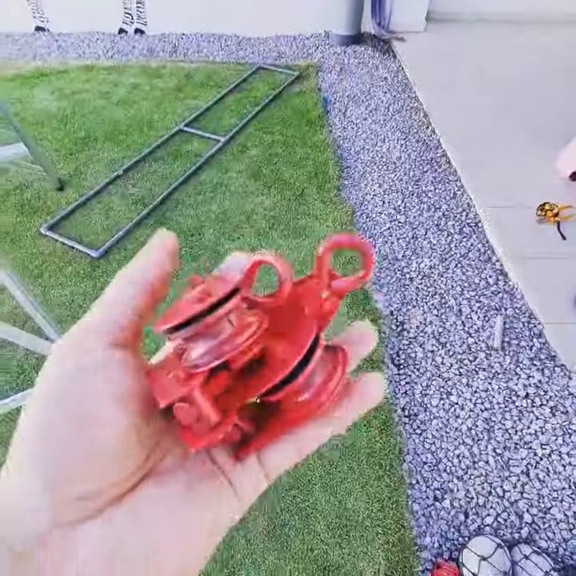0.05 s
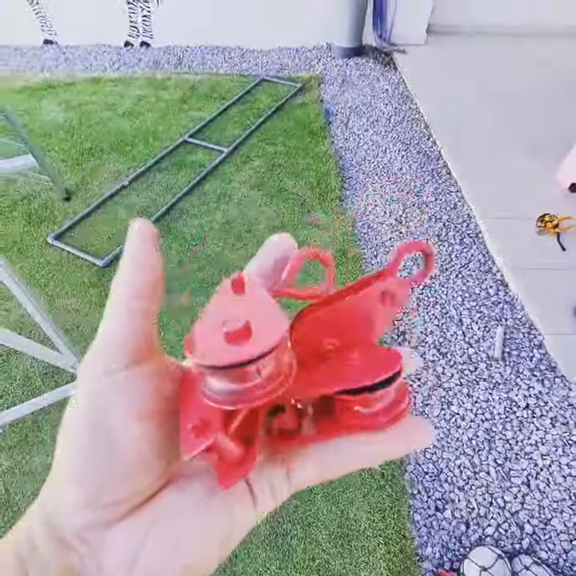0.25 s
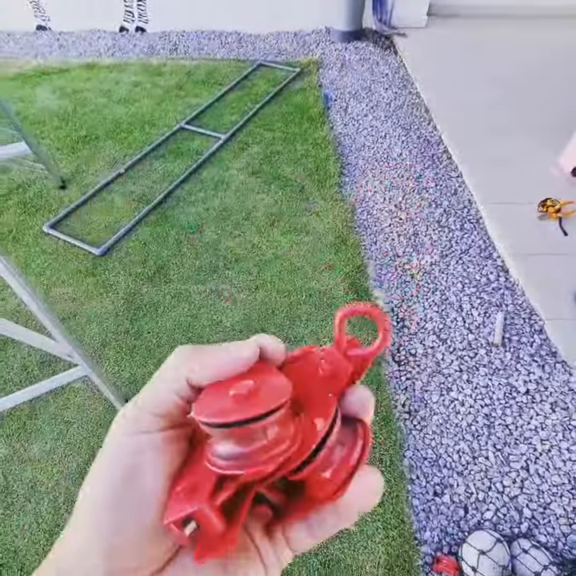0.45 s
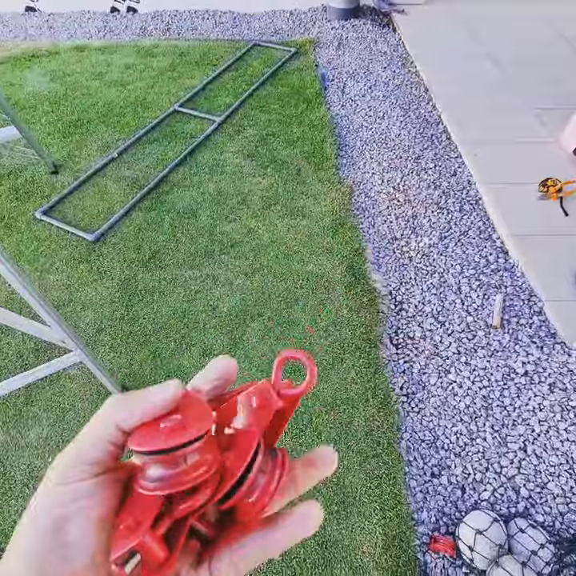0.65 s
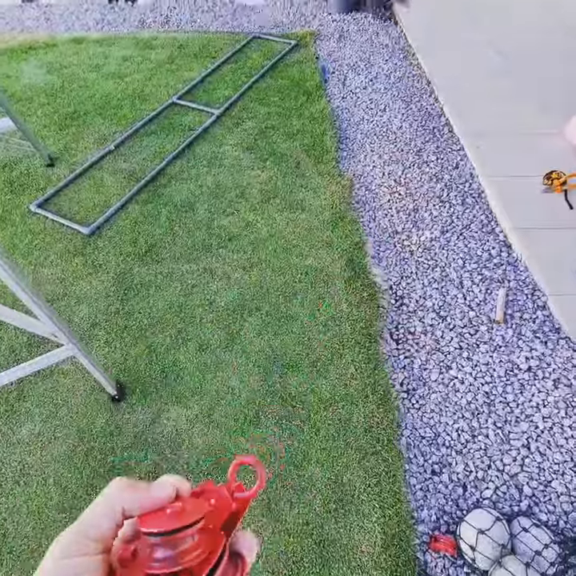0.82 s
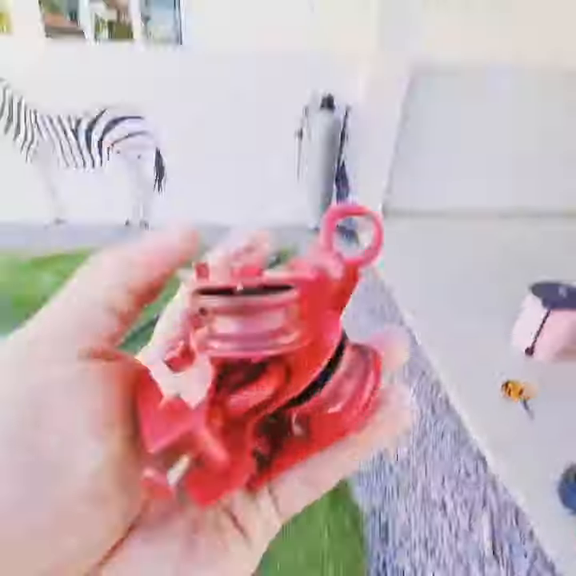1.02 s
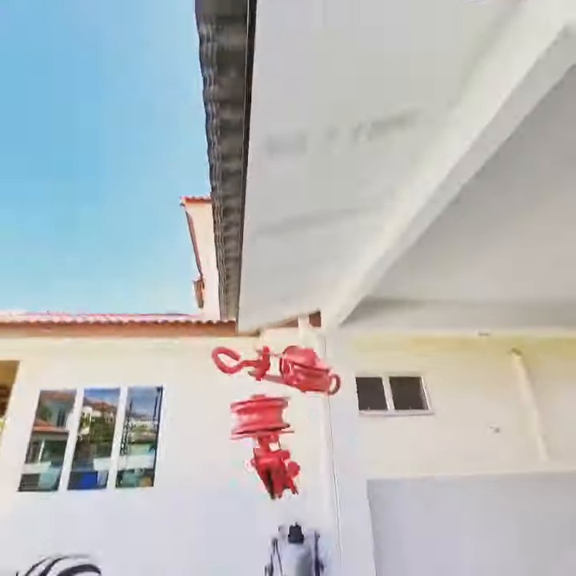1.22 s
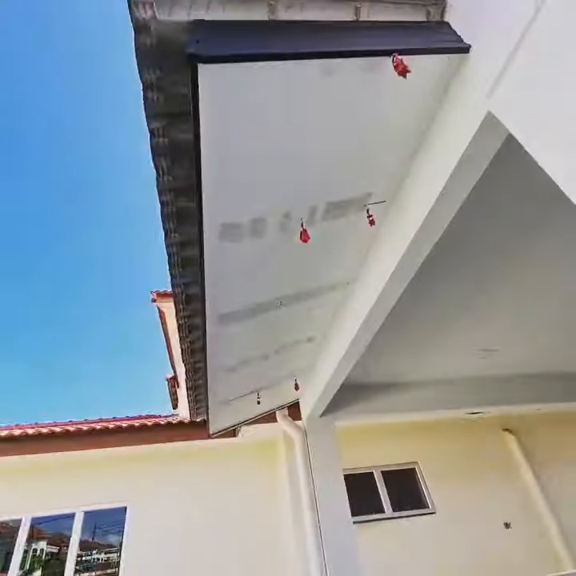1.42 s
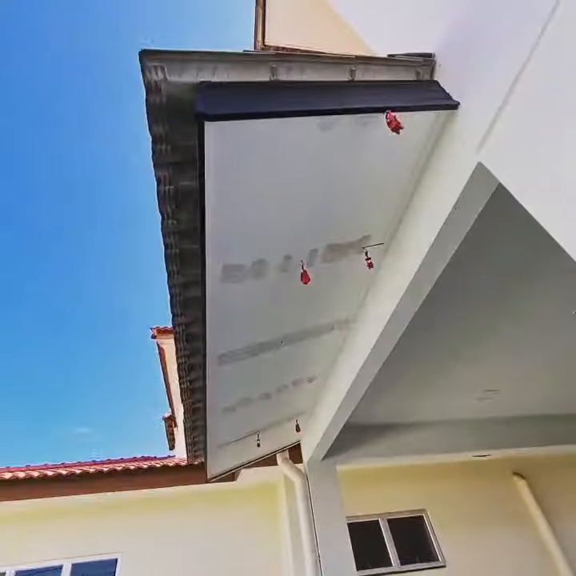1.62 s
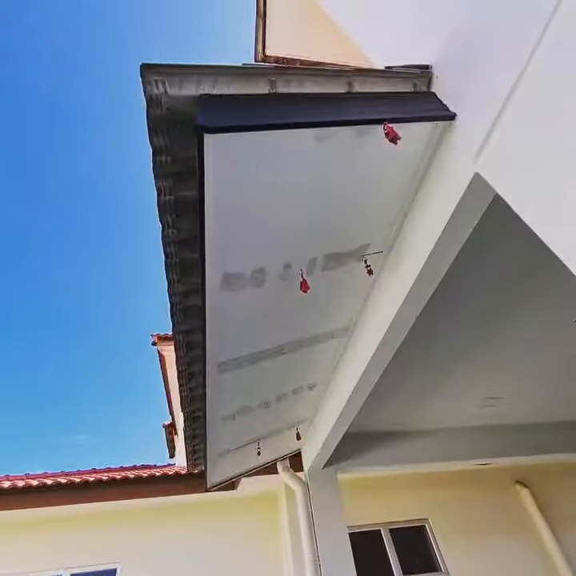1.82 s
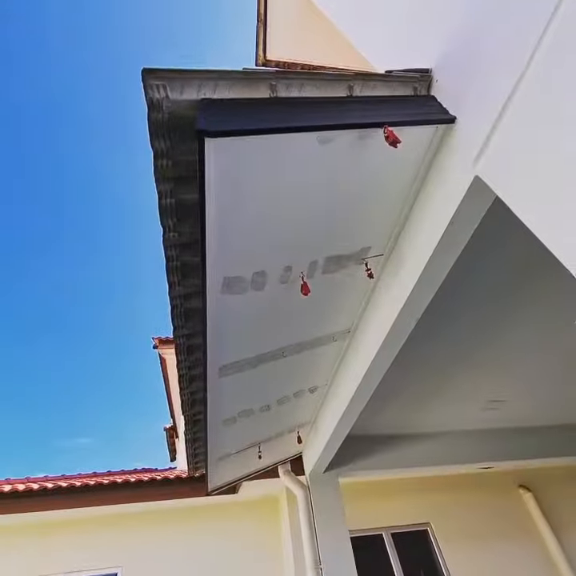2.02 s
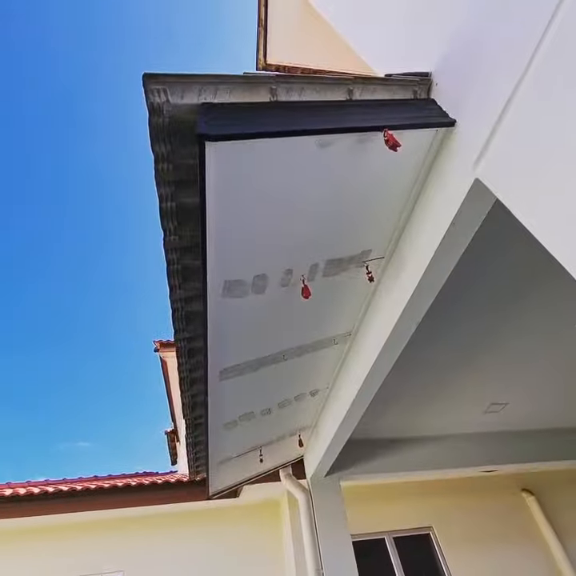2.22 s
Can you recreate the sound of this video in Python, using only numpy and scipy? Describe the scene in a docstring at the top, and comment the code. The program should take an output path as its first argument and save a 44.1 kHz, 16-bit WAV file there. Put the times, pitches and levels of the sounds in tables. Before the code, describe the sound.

Small steel pulleys clack and rattle together in a hand, close and slightly right, in a back yard. They jangle and ring, then cut off abruptly, leaving a faint distant rumble and light wind on the microphone.

```python
"""Steel pulleys in a back yard

Small pulleys knock together in a hand, a little right of a stereo pair. Gripped, they clack and die at
once; when the hand opens, and when they dangle, their plates jangle and ring on. House walls return a
short tail. The sound breaks off in mid-ring, and after a short silence only the distant rumble under
the eaves and a light wind on the microphones remain."""
import sys
import numpy as np
from scipy import signal
from scipy.fft import rfft, irfft
from scipy.io import wavfile

SR = 44100
rng = np.random.default_rng(int(sys.argv[2]) if len(sys.argv) > 2 else 0)


def generate_wav(sig):
    """Save sig (samples, or channels by samples) to the path in sys.argv[1] as 16-bit PCM at SR."""
    pcm = np.round(np.clip(np.atleast_2d(sig).T, -1, 1) * 32767).astype(np.int16)
    wavfile.write(sys.argv[1], SR, pcm)


N = 103635
TIME = np.arange(N) / SR

# Modes of each steel part, first in the hand, then on the three dangling pulleys.
# Each row under a part's name: frequency in Hz, relative level in dB.
PART_MODES = { "sheave": [(3170, -4.5), (3440, -3), (4480, -8.5), (6050, -6)], "side plate": [(3360, 1.5),
              (5680, -4.5), (9400, -5.5), (12690, -2.5)], "loose": [(1908, -10), (2664, 0), (3385, -4.5),
              (6802, -6), (7602, -4.5), (9325, 5), (11513, -5)], "upper": [(3003, -1.5), (3555, -3.5),
              (4120, -0.5), (10200, -9), (12450, 1), (14660, -1)], "middle": [(4135, 2), (6080, -5),
              (8403, -0.5), (8870, -6), (9372, -1.5), (12089, -1), (12381, -2)], "lower": [(2988, -14),
              (3675, -7.5), (3970, -1), (4088, -5.5), (5366, -1.5), (6551, -6), (8867, 3), (12380, -5),
              (13510, -11)]}
CONTACT_S, CUTOFF_HZ = 0.00086, 15900


def knocks(count=260):
    """Each knock is a brief crack and a crowd of damped steel modes, different at every contact point."""
    # Steel on steel. Each row: start in seconds, level in dB, treble tilt in dB,
    # pitch favoured by the spot struck in Hz, t60 in seconds.
    blows = [(0.2036, -15.5, -5, 3400, 0.012), (.2160, -25.5, -6, 12500, .04),
             (.2521, -35.5, -10.5, 2500, .028), (.3302, -29, -19.5, 2750, .05),
             (.3360, -29.5, -13, 2634, .06), (.3730, -29, -9, 2760, .03), (.3902, -25.5, -1.5, 12800, .025),
             (.4200, -26.5, 4.5, 11700, .05), (.4270, -24.5, -13.5, 2950, .035),
             (.46, -18.5, 3, 4860, .017), (.465, -19.5, 1.5, 11400, .08), (.4741, -17, -6, 9346, .042),
             (.4875, -15, -7.5, 5140, .033), (.5047, -23, -7, 3500, .032), (.5160, -20, 0.5, 3370, .025),
             (.5231, -12, -9.5, 3490, .02), (.5275, -10.5, 2.5, 3260, .033), (.5367, -14.5, -5, 5350, .04),
             (.5430, -14.5, 0, 3506, .032), (.5524, -10.5, 4, 3686, .041), (.7330, -47, -28, 3240, .03),
             (.8115, -22.5, 0.5, 3160, .05), (.8325, -21.5, 2, 5330, .035), (.8921, -20.5, 6.5, 8350, .022),
             (.9010, -28.5, -7.5, 9220, .033), (.9649, -36.5, -3.5, 8980, 0.029),
             (.982, -31.5, 0.5, 3030, 0.044), (1.1705, -27.5, -12, 6300, .037),
             (1.1890, -26.5, -7, 12000, .078), (1.1990, -20.5, 0, 3130, .07),
             (1.2082, -15, 5.5, 8700, 0.014), (1.2200, -24.5, 0.5, 2910, .09),
             (1.2400, -24.5, 1, 3390, .08), (1.2500, -21, 9, 11350, .05), (1.2740, -24, 1, 4340, .16),
             (1.3227, -29.5, 6.5, 9500, .1), (1.3475, -23, 7, 4040, .1)]
    # Spectrum of the crack and the many weak modes. Each row: frequency in Hz, relative level in dB.
    steel_spectrum = [(300, -30), (700, -15.5), (1200, -18), (2100, -3.5), (3200, -0.5), (4200, -2),
                      (5700, -0.5), (7500, -4.5), (9000, 0), (10200, -4.5), (11600, 0.5), (13300, -11.5),
                      (15600, -10.5)]
    sheave_db, grip_detune = -9, 0.034   # the grip shifts the sheaves' pitch from knock to knock
    crack_db, crack_t60_s = 0.5, 0.0041
    spot_db, spot_half_width_hz = 12, 200
    free_t60_s = .07   # longer knocks come from freer parts: fewer modes, less bass
    t60_ratios = np.exp(.4 * np.array([-1, 0, 1]))
    out, t = np.zeros((2, N)), TIME[:SR // 8]
    bin_hz, attack_samples = np.fft.rfftfreq(len(t), 1 / SR), SR // 200
    sheave_hz, mode_db = np.transpose(PART_MODES["sheave"])
    sheave = from_db(sheave_db) * from_db(mode_db) / np.linalg.norm(from_db(mode_db))
    for start, db, treble_db, spot_hz, t60 in blows:
        share = min(1, free_t60_s / t60)
        weak_hz = 300 + (np.arange(count) + rng.random(count)) * (CUTOFF_HZ - 300) / count
        woken = np.diff(np.floor(rng.random() + share * np.arange(count + 1)))
        weak = woken * from_db(at_hz(steel_spectrum, weak_hz))
        hz = np.r_[weak_hz, sheave_hz * (1 + grip_detune * rng.standard_normal(len(sheave)))]
        gain = np.r_[weak / np.linalg.norm(weak), sheave]
        tilt = [(1500, 20 * np.log10(share)), (3000, 0.0027), (12000, treble_db)]
        spot_boost = spot_db / (1 + ((hz - spot_hz) / spot_half_width_hz) ** 2)
        struck = two_mics(hz) * gain * from_db(at_hz(tilt, hz) + spot_boost)
        damping_class = rng.integers(len(t60_ratios), size=len(hz))
        body = sum(sines(struck * (damping_class == k), hz, len(t)) * dying(t, t60 * ratio)
                   for k, ratio in enumerate(t60_ratios))
        crack_gain = from_db(at_hz(steel_spectrum, bin_hz) + at_hz(tilt, bin_hz))
        crack = rms_one(irfft(two_mics(bin_hz) * crack_gain, len(t))) * dying(t, crack_t60_s)
        knock = 2 * body / np.linalg.norm(struck) + from_db(crack_db) * crack
        knock *= 1 - np.exp(-t / CONTACT_S)
        add(out, start, placed(from_db(db) * knock / np.std(knock[:, :attack_samples]), start))
    return out


def rings(count=4):
    """Parts ring in clear partials; rebounds strike them again with a new mix of modes, so they jangle."""
    # Blows that set one part ringing. Each row: start in seconds, part, level in dB, t60 in seconds.
    blows = [(.2040, "sheave", -9, 0.018), (.3354, "loose", -27.5, .2), (.3913, "loose", -26.5, .16),
             (.8120, "side plate", -20, .04), (.8335, "sheave", -23.5, .035), (1.2085, "upper", -22.5, .22),
             (1.247, "sheave", -20.5, .07), (1.2503, "middle", -24.5, .22), (1.3225, "middle", -22, .15),
             (1.3505, "lower", -15, .3)]
    longest_gap_s, rebound_loss_db = .015, 3.5
    out, t = np.zeros((2, N)), TIME[:SR // 2]
    contact = 1 - np.exp(-t / CONTACT_S)
    for start, part, db, t60 in blows:
        hz, mode_db = np.transpose(PART_MODES[part])
        modes = from_db(mode_db) / np.linalg.norm(from_db(mode_db))
        age = 0
        for k in range(count):
            spread = two_mics(hz)
            mix = rms_one(np.abs(spread)) if k else 1   # the first blow wakes every mode
            ring = sines(modes * mix * spread / np.abs(spread), hz, len(t)) * dying(t, t60) * contact
            gain = np.sqrt(2) * from_db(db - k * rebound_loss_db) * dying(age / 2, t60)
            add(out, start + age, placed(gain * ring, start))
            age += longest_gap_s * rng.uniform(.5, 1)
    return out


def placed(x, seconds):
    """Pan a sound to where the hand holds the pulleys at that moment."""
    # The hand's path across the pair. Each row: time in seconds, left minus right in dB.
    hand_path = [(.21, -2.5), (.34, -0.5), (.46, -5), (.55, -1), (.85, -9.5), (1.2, -0.5), (1.35, -8.5)]
    return panned(x, np.interp(seconds, *np.transpose(hand_path)))


def two_mics(hz, scatter_db=5.5, longest_lag_s=.00005):
    """Each mode reaches the two microphones with a random strength and phase, partly shared."""
    size = len(hz)
    phase = rng.uniform(0, 2 * np.pi, size) + rng.standard_normal((2, size))
    phase[0] -= 2 * np.pi * hz * longest_lag_s * rng.random()   # the left microphone is farther away
    strength = np.clip(rng.standard_normal(size) + rng.standard_normal((2, size)), -2, 2)
    return from_db(scatter_db * strength) * np.exp(1j * phase)


def house_walls(x, db=-23.5, t60_s=0.44, delay_s=0.01199, top_hz=11000):
    """Walls and porch scatter the clinks into a short, slightly duller tail."""
    t = TIME[:SR]
    tail = rng.standard_normal((2, SR)) * dying(t, t60_s) * np.clip(t / delay_s - .5, 0, 1)
    tail = signal.sosfilt(signal.butter(2, top_hz, fs=SR, output="sos"), tail)
    tail /= np.linalg.norm(tail, axis=1, keepdims=True)
    return from_db(db) * signal.fftconvolve(x, tail, axes=1)[:, :N]


def wind(corner_hz=82, rise_s=0.0027, t60_s=1):
    """Low puffs of wind on the microphones swell quickly and die away."""
    # Each row: start in seconds, level in dB, left minus right in dB.
    puffs = [(.135, -38, 4.5), (1.112, -40, -2.5), (1.25, -42, 9), (1.448, -34.5, 9)]
    buffeting = air(lambda f: f / corner_hz / (1 + (f / corner_hz) ** 6))
    out = np.zeros((2, N))
    for start, db, pan_db in puffs:
        age = np.maximum(TIME - start, 0)
        envelope = np.minimum(age / rise_s, 1) * dying(age, t60_s)
        out += panned(from_db(db) * buffeting * envelope, pan_db)
    return out


def distant_rumble(spectrum, motors, db):
    """Rumble from beyond the yard, with the wavering drone of far motors."""
    out = from_db(db) * air(lambda f: from_db(at_hz(spectrum, f)))
    for hz, drone_db, width_hz in motors:
        out += from_db(drone_db) * air(lambda f: 1 / (1 + (2 * (f - hz) / width_hz) ** 2))
    return out


def air(gain_at, side_gain=0.85):
    """Wide stereo noise of a given spectrum, rms 1."""
    mid, side = rng.standard_normal((2, N))
    pair = np.array([mid + side_gain * side, mid - side_gain * side])
    return rms_one(irfft(rfft(pair) * gain_at(np.fft.rfftfreq(N, 1 / SR)), N))


def sines(strengths, hz, size):
    """A sum of steady stereo sines with the given complex strengths."""
    lines = np.zeros((2, size // 2 + 1), complex)
    lines[:, np.round(hz * size / SR).astype(int)] = strengths
    return irfft(lines, size) * size / 2


def from_db(db):
    """Decibels to gain."""
    return 10 ** (np.asarray(db) / 20)


def rms_one(x):
    """Scale to unit rms."""
    return x / np.sqrt(np.mean(x ** 2) + 1e-20)


def dying(t, t60):
    """Exponential decay, 60 dB down after t60 seconds."""
    return np.exp(-np.log(1000) * t / np.maximum(t60, 1e-3))


def at_hz(points, hz):
    """Read a spectrum in dB on a log-frequency axis."""
    point_hz, db = np.transpose(points)
    return np.interp(np.log(np.maximum(hz, 1)), np.log(point_hz), db)


def add(out, start_s, x):
    """Mix x in at start_s."""
    i = int(start_s * SR)
    out[:, i:i + x.shape[1]] += x[:, :N - i]


def panned(x, pan_db):
    """Place a sound between the microphones; positive is left."""
    return x * from_db([[pan_db / 2], [-pan_db / 2]])


def scene():
    """The pulleys over the lawn, a short silence, then the empty yard from under the eaves."""
    # Distant rumble at each spot. Each row: frequency in Hz, relative level in dB.
    lawn_spectrum = [(25, -13.5), (75, -0.5), (115, -13.5), (260, -13), (600, -29.5), (6000, -42),
                     (7800, -50.5), (15000, -54)]
    eaves_spectrum = [(25, -11.5), (72, 0), (105, -16.5), (420, -26.5), (900, -34), (2500, -38),
                      (6000, -47), (8500, -59)]
    # Far motors at each spot. Each row: pitch in Hz, level in dB, bandwidth in Hz.
    lawn_motors = [(240, -62, 30), (386, -59, 90)]
    eaves_motors = [(207, -61.5, 13)]
    break_s, break_t60_s, resume_s, fade_s = 1.378, 0.03, 1.447, 0.0051
    steel, puffs = knocks() + rings(), wind()
    lawn = steel + house_walls(steel) + distant_rumble(lawn_spectrum, lawn_motors, db=-47.5) + puffs
    eaves = distant_rumble(eaves_spectrum, eaves_motors, db=-47) + puffs
    fade_out = dying(np.maximum(TIME - break_s, 0), break_t60_s)
    fade_in = np.clip((TIME - resume_s) / fade_s, 0, 1)
    return lawn * fade_out + eaves * fade_in


def record(dry):
    """The highest peaks are rounded off and the top of the treble is cut."""
    rounded = dry / (1 + (dry / .85) ** 6) ** (1 / 6)
    return signal.sosfilt(signal.ellip(10, .2, 80, CUTOFF_HZ, fs=SR, output="sos"), rounded)


dry = scene()
out = record(dry)
generate_wav(out)
```